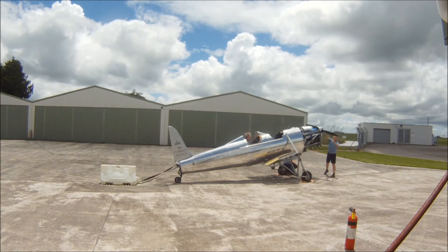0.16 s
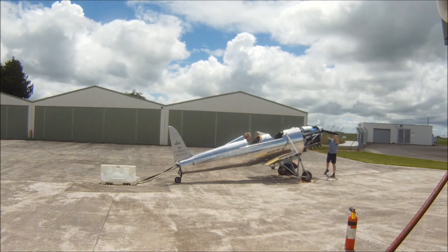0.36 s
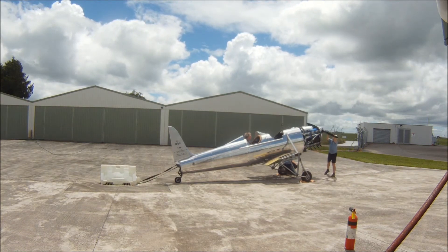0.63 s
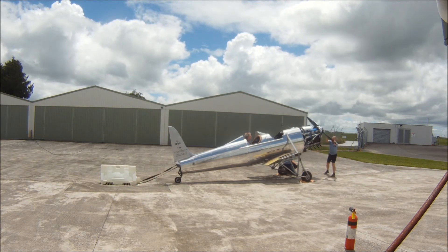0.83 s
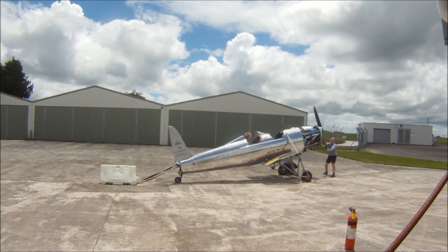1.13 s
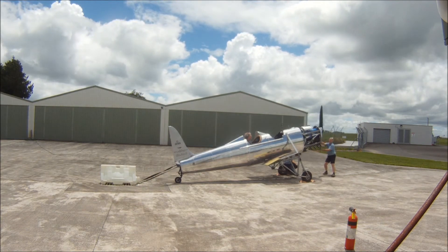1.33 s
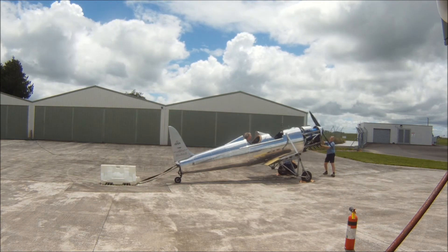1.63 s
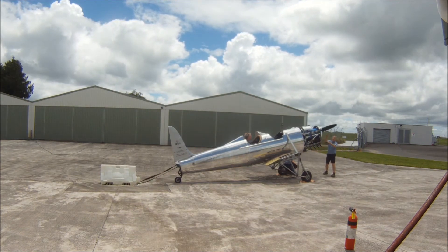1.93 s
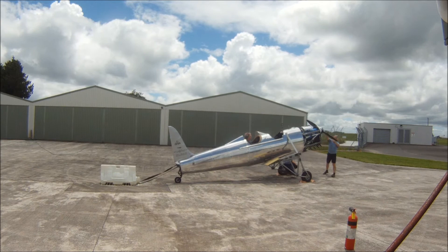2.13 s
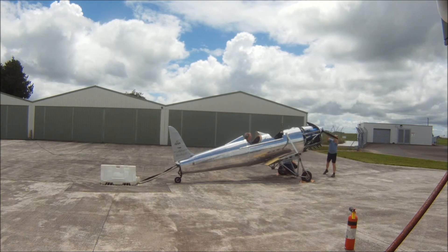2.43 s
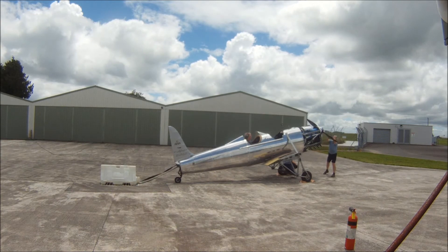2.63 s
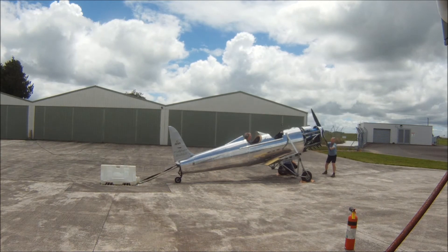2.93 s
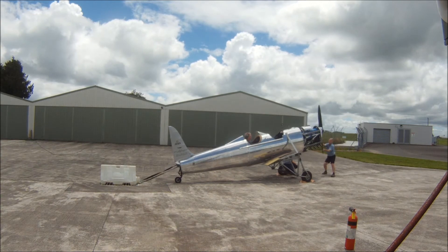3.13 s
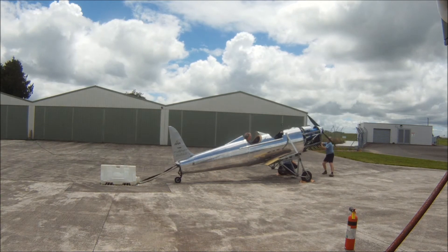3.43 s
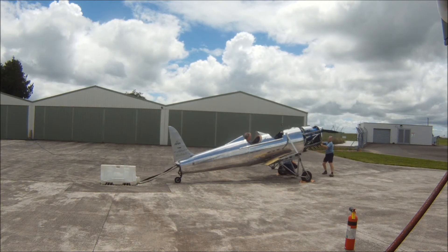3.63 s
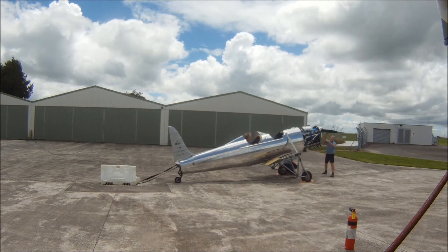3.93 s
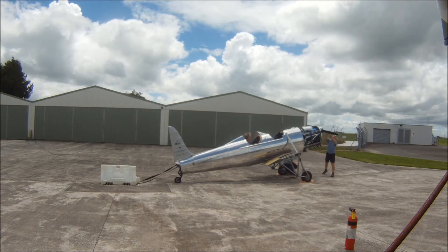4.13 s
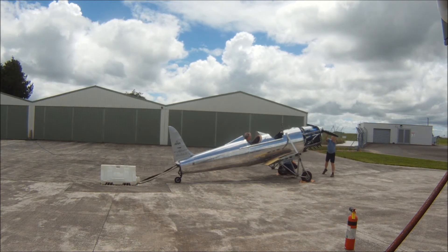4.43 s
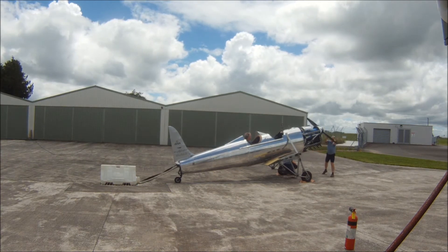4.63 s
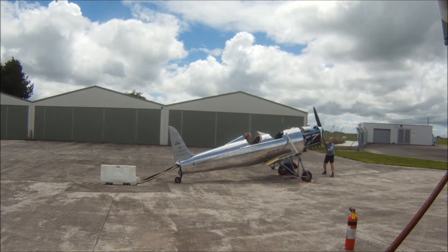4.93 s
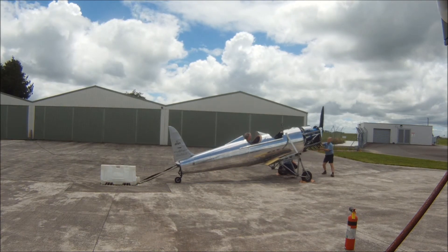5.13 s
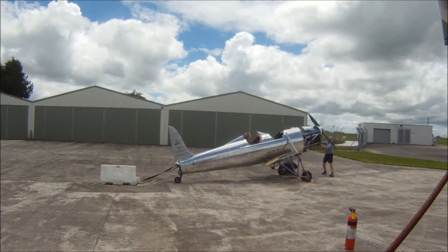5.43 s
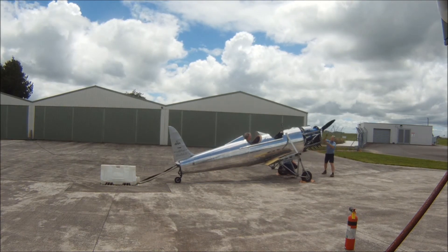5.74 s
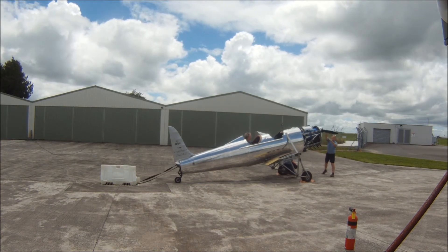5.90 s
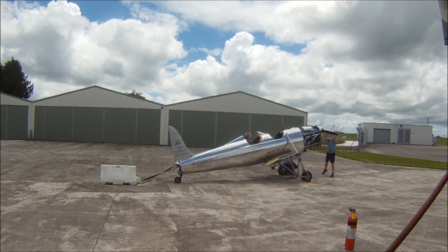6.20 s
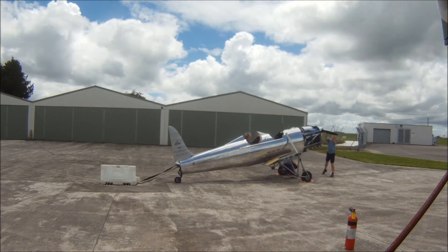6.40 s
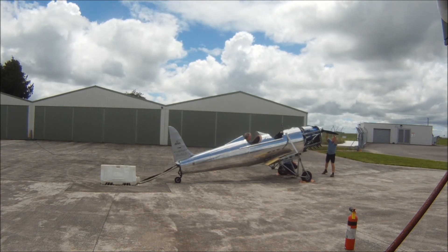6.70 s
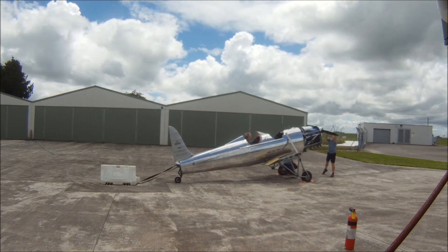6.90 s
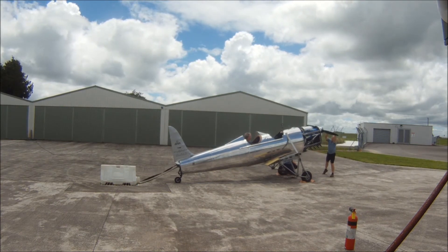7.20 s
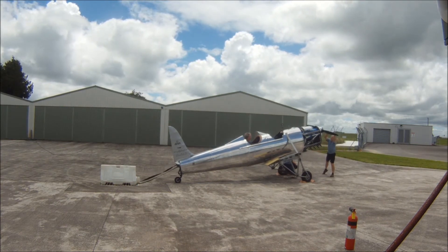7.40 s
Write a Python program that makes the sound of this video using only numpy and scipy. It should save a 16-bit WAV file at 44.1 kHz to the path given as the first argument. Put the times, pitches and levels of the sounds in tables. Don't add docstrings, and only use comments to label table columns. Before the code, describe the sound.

Outdoors on a concrete apron, faint ticks of loose metal come first over a low generator hum and a receding propeller plane. Then three loud, double-hit clanks sound about two seconds apart, each rattling on and scattering back off the hangars. Small birds chirp faintly. Later, gusts thump the exposed microphone. The engine never catches. The sound is gritty and low-fidelity, with a harsh mirrored treble.

```python
import sys
import numpy as np
from scipy import signal
from scipy.fft import rfft, irfft, next_fast_len
from scipy.io import wavfile
from scipy.ndimage import uniform_filter1d

SR = 44100
rng = np.random.default_rng(int(sys.argv[2]) if len(sys.argv) > 2 else 0)


def gain_from_db(level_db):
    decades = np.asarray(level_db, float) / 20
    return 10 ** decades


def unload_audio(sound):
    columns = np.transpose(np.atleast_2d(sound))
    steps = np.round(np.clip(columns, -1, 1) * 32767)
    wavfile.write(sys.argv[1], SR, steps.astype(np.int16))


N = 333389

# pitch_hz, level_db, t60_s
COWLING = [(360.6, -15.5, 0.91), (455, -10.5, 0.38), (593.6, 9, 0.21), (633, -16, 0.38)]


def engine():
    out = np.zeros(N)
    ms = np.arange(1500) / SR * 1000
    hardest_db = max(row[1] for row in CLANKS)
    for s, db, hz, low_db, middle_db, top_db, chatter_ms in blows():
        softer_db = hardest_db - db
        u = ms / chatter_ms
        chatter = rng.standard_normal(len(u)) * u * np.exp(-u)
        crankcase = crowd(hz - 130, 429 - 9 * softer_db, 0.012)
        low = crowd(545, 106, 0.068)
        middle = crowd(1330, 270, 0.034)
        top = crowd(5000, 700, 0.029)
        parts = [(crankcase, 0),
                 (low, low_db - 7.5),
                 (middle, middle_db - 0.5 - 0.24 * softer_db),
                 (top, top_db + 11 - 0.4 * softer_db)]
        for modes, rel_db in parts:
            add(out, s - 0.003, gain_from_db(db + rel_db) * ring(modes, chatter))
        cowling_db = db + low_db - 4.5 - 0.59 * softer_db
        add(out, s + 0.00412, gain_from_db(cowling_db) * ring(COWLING, np.ones(1)))
    return out


# start_s, peak_db, crankcase_hz, echo_db (added to the first echo's level)
CLANKS = [
    (1.504, -17, 3236, -3),
    (3.3478, -15.5, 3006, -6),
    (5.2799, -16, 3184, -2),
]
# delay_s, level_db (re clank), pitch_ratio, low_db and middle_db (re
CLANK_PARTS = [
    (0, -2, 1.0, 0.5, -13),
    (.031, -7.5, 0.94, -8, -13),
    (.0785, -2, .97, -4.5, -17),
    (.1065, -12.5, 0.9, -5.5, -25),
]
# start_s,
# peak_db, crankcase_hz, body_db (re peak)
KNOCKS = [(0.0648, -42.5, 2750, 11), (0.2209, -49, 2360, 22.5), (0.2713, -46.5, 2900, 10),
          (0.3107, -49, 2340, -13), (0.6389, -52.5, 2460, 17), (1.6244, -38, 2980, 8.5),
          (1.6596, -41.5, 3070, 14.5), (1.7255, -51, 3020, 24), (1.8562, -44.5, 2370, 17),
          (1.8771, -40, 2780, 16), (1.9929, -40, 3050, 9.5), (2.0807, -41, 2780, 9),
          (2.1545, -43, 2820, -24), (2.2433, -48, 3080, 12), (3.5279, -44, 3040, -3),
          (3.5872, -38.5, 2870, 5), (3.6845, -44.5, 2470, 14.5), (3.7394, -47.5, 2630, 20),
          (3.8222, -43.5, 3040, 11.5), (3.931, -38, 2880, 7), (4.1465, -37.5, 3140, 4),
          (4.1694, -42, 2080, 8.5), (4.8055, -50, 2350, 14), (5.2684, -37.5, 2860, 14.5),
          (5.4394, -45.5, 3100, 18.5), (5.4904, -49, 2690, -4), (5.6161, -36.5, 3400, 3.5),
          (5.7743, -48.5, 2640, 21), (5.8666, -44, 2920, 12.5), (6.0696, -45.5, 2970, 10)]


def blows():
    rows = []
    for s, db, hz, echo_db in CLANKS:
        for k, (delay, rel_db, ratio, low_db, middle_db) in enumerate(CLANK_PARTS):
            part_db = db + rel_db + echo_db * (k == 2)
            chatter_ms = 1.53 if k else 3.1
            rows.append((s + delay, part_db, hz * ratio, low_db, middle_db, -22, chatter_ms))
    for s, db, hz, body_db in KNOCKS:
        rows.append((s, db, hz, body_db, body_db - 10, -18, 3.2))
    return rows


def crowd(hz, spread_hz, t60, count=30):
    place = np.linspace(-2.05, 2.13, count) + rng.uniform(-0.13, 0.12, count)
    return np.c_[hz + spread_hz * place, -4.3 * place ** 2, t60 * rng.uniform(0.6, 1.4, count)]


def ring(modes, chatter):
    hz, db, t60 = np.transpose(modes)[:, :, None]
    t = np.arange(round(t60.max() * SR)) / SR
    decaying = gain_from_db(db - 60 * t / t60) * np.sin(2 * np.pi * hz * t)
    response = decaying.sum(0) * (1 - np.exp(-(t / 0.0012) ** 2))
    out = signal.fftconvolve(response, chatter)
    return out / abs(out).max()


# pitch_hz, t60_s
NEAR_DECAY = [(300, 0.17), (1200, 0.1), (3000, 0.13), (5500, 0.29)]
FAR_DECAY = [(250, 2.9), (500, 3.5), (1000, 1.7), (2800, 1.64), (5500, 2.4)]
# pitch_hz, level_db
RETURN_COLOUR = [(250, 0), (450, 11.5), (850, -5), (1300, 5), (2400, 0.5), (3700, -1), (5000, -1.5)]


def apron(x):
    frame = dict(nperseg=256, noverlap=192)
    hz, t, z = signal.stft(x, SR, **frame)
    power = uniform_filter1d(abs(z) ** 2, size=3, axis=0)
    back = 0
    for decays, db in ((NEAR_DECAY, -4.5), (FAR_DECAY, -10.5)):
        keep = 1e-6 ** ((t[1] - t[0]) / read(decays, hz))
        echoes = [signal.lfilter([0, 0, 1 - k], [1, -k], p) for k, p in zip(keep, power)]
        back = back + gain_from_db(db) ** 2 * np.array(echoes)
    ragged = rng.standard_normal(N) * gain_from_db(1.84 * wander(54.0))
    noise = signal.stft(ragged, SR, **frame)[2]
    noise = gain_from_db(read(RETURN_COLOUR, hz))[:, None] * noise / np.sqrt(np.mean(abs(noise) ** 2))
    return x + signal.istft(noise * np.sqrt(abs(back)), SR, **frame)[1][:N]


# start_s, length_s, rumble_db, buffet_db (re rumble)
GUSTS = [(0, 0.052, -44, -5), (0.197, 0.096, -38, -7), (1.19, 0.033, -37.5, -27),
         (1.313, 0.082, -39.5, -21), (3.22, 0.39, -36, -17), (3.71, 0.15, -32.5, -10.5),
         (4.23, 0.047, -45, -3), (4.452, 0.075, -29.5, -18), (4.668, 0.12, -29.5, -12),
         (4.83, 0.3, -28.5, -15), (5.424, 0.13, -34, -11), (5.548, 0.17, -30, -18), (5.79, .4, -33.5, -17),
         (6.314, 0.3, -29, -12), (6.69, 0.037, -29.5, -9), (6.793, 0.44, -28.5, -13.5),
         (7.25, 0.38, -36, -25)]
# pitch_hz, level_db (per Hz)
RUMBLE = [(12, -26), (28, 6), (45, 4), (80, 1.5), (130, -9), (300, -87)]
BUFFET = [(60, -12.5), (120, 2), (250, -6.5), (450, -15), (1200, -47), (2500, -99)]


def wind():
    rise_s, fall_s = 0.02, 0.03
    rumble = bursts([row[:3] for row in GUSTS], -52, rise_s, fall_s)
    buffet_rows = [(s, length, db + rel_db) for s, length, db, rel_db in GUSTS]
    buffet = bursts(buffet_rows, -50, rise_s, fall_s)
    wakes = [(s, 0.022, db - 13 + 0.5429 * (edge_db + 32.5)) for s, db, hz, edge_db in EDDIES]
    buffet = np.hypot(buffet, bursts(wakes, calm_db=-90, rise_s=0.0074, fall_s=0.012))
    out = rumble * gain_from_db(0.68 * wander(38.5)) * coloured(RUMBLE)
    out += buffet * gain_from_db(0.53 * wander(33.0)) * coloured([*BUFFET, (5000, -110)])
    return out + eddies()


# start_s, peak_db, pitch_hz, edge_db (re peak)
EDDIES = [(4.453, -21.5, 89, -29.5), (4.488, -21.5, 62.7, -34), (4.695, -18, 62, -43),
          (4.852, -15, 130, -49), (4.862, -9, 72, -46.5), (4.918, -18, 59, -31), (5.025, -12.5, 149, -21.5),
          (5.04, -13, 194, -33), (5.062, -33, 153, -44), (5.469, -20.5, 50.3, -31), (5.494, -27, 51.1, -39),
          (5.564, -17, 78, -49), (5.579, -22, 74, -34.5), (5.62, -30.5, 71, -18.5), (5.839, -30, 87.6, -31),
          (6.103, -19.5, 64.6, -31), (6.336, -18, 130, -40), (6.349, -16, 50.3, -71),
          (6.538, -17, 51.1, -35), (6.62, -22.5, 86.1, -29), (6.635, -10.5, 75, -41), (6.805, -33, 68, -32),
          (6.836, -16, 51.3, -33), (7.04, -13.5, 49, -36), (7.06, -18, 70.4, -37),
          (7.117, -15.5, 52.6, -36), (7.224, -18.5, 93.4, -55), (7.367, -22, 51.1, -31.5)]


def eddies():
    out = np.zeros(N)
    edge_filter = signal.butter(5, [400, 1750], "bandpass", fs=SR)
    for s, db, hz, edge_db in EDDIES:
        t = np.arange(round(2.2 * SR / hz)) / SR
        turns = hz * (t - t[-1] / 2) + rng.uniform(-0.31, 0.19)
        wave = np.hanning(len(t)) * -np.cos(2 * np.pi * turns)
        edge = signal.lfilter(*edge_filter, rng.standard_normal(600)) * np.hanning(600)
        add(out, s - 0.006, gain_from_db(db - 2.5) * wave)
        add(out, s + 0.00098, gain_from_db(db + edge_db) * edge / abs(edge).max())
    return out


# start_s, length_s, start_hz, end_hz, level_db
WHISTLES = [(.025, 0.05, 4150, 3350, -64), (1.13, 0.07, 2000, 2010, -63), (1.135, 0.11, 2090, 2230, -60.5),
            (1.15, .07, 3380, 3480, -65), (1.158, 0.075, 4350, 4320, -64), (2.61, .075, 3950, 3680, -66),
            (2.885, .055, 4300, 4170, -68), (3.205, .11, 4350, 4100, -65),
            (4.927, 0.047, 2110, 2090, -49.5), (4.99, .035, 2110, 2130, -61), (5.385, .06, 4850, 4400, -60),
            (5.66, 0.18, 4300, 4100, -69.5), (6.79, 0.055, 4250, 3950, -67), (7.26, .12, 4230, 4050, -69),
            (7.295, .03, 5800, 5650, -70), (7.505, .045, 5400, 4900, -67)]
# start_s, length_s, start_hz, end_hz, level_db
TRILLS = [
    (1.2, 0.069, 5400, 5450, -62),
    (1.201, .065, 4950, 5000, -65),
    (1.25, 0.24, 2290, 2130, -62.5),
    (2.985, 0.165, 5700, 3600, -58.5),
    (3.236, .092, 6100, 4400, -57),
    (5.55, .08, 4200, 4150, -69),
    (6.82, 0.18, 2930, 2970, -64),
    (6.93, .12, 4700, 4250, -67),
    (7.12, 0.14, 4750, 4250, -66.5),
    (7.38, 0.18, 3200, 3030, -62.5),
]


def birds():
    out = np.zeros(N)
    notes = [(*row, 0) for row in WHISTLES] + [(*row, 47.6) for row in TRILLS]
    for s, length, start_hz, end_hz, db, trill in notes:
        t = np.arange(round(length * SR)) / SR
        hz = end_hz + (start_hz - end_hz) * (1 - t / length) ** 1.25
        shape = signal.windows.tukey(len(t), 0.4) * (1 - 0.84 * np.sin(np.pi * trill * t) ** 2)
        swell = gain_from_db(db + 0.005 * (end_hz - hz))
        blur = evened(uniform_filter1d(rng.standard_normal(len(t)), size=250))
        turns = np.cumsum(hz * (1 + 0.007 * blur)) / SR
        add(out, s, np.sqrt(2) * swell * shape * np.sin(2 * np.pi * turns))
    return out * gain_from_db(2.7 * wander(68.0))


# start_s, length_s, level_db
FLOCK = [
    (.95, 0.21, -71),
    (1.2, .12, -86),
    (1.32, 0.33, -68),
    (4.22, 0.37, -69.5),
    (6.92, 0.21, -76),
]


def flock():
    gain = bursts(FLOCK, calm_db=-76.5, rise_s=0.094, fall_s=0.094)
    twitter = coloured([(4100, -61), (4450, -1.0), (4950, -4.0), (5300, -32)])
    return gain * gain_from_db(1.9 * wander(31.0)) * twitter


# time_s, shaft_hz, level_db
FLYBY = [
    (0, 27.02, -44),
    (2, 25.62, -45.5),
    (4, 24.2, -44.5),
    (7.6, 23.59, -52),
]
# order, level_db
FLYBY_ORDERS = [(2, 0), (3, 1.5), (4, -3)]


def aircraft():
    hz, db = along(FLYBY)
    return gain_from_db(db) * drone(hz, FLYBY_ORDERS, 0.002, 2.2)


# order, level_db
GENERATOR_ORDERS = [(2, -43), (3, -43.5), (4, -56), (5, -59), (6, -59), (8, -62)]


def generator():
    return drone(43.05, GENERATOR_ORDERS, 0.0015, 1.5)


def drone(hz, orders, waver, flutter_db):
    turns = np.cumsum(hz * (1 + waver * wander(1.0))) / SR
    out = np.zeros(N)
    for k, db in orders:
        sine = np.sqrt(2) * np.sin(2 * np.pi * (k * turns + rng.random()))
        out += gain_from_db(db + flutter_db * wander(12.6)) * sine
    return out


# pitch_hz, level_db (per Hz)
AIR = [(15, -55), (30, -28.5), (65, -2.5), (114, -5.5), (171, -14), (291, -17), (578, -18), (744, -28),
       (1550, -40.5), (2240, -35.5), (3010, -35.5), (4870, -50.5), (5990, -89), (7790, -90)]


def air():
    patches = rng.standard_normal((513, N // 256 + 5))
    patches = uniform_filter1d(patches, 10, 0)
    patches = evened(uniform_filter1d(patches, 16, 1))
    z = signal.stft(coloured(AIR), nperseg=1024, noverlap=768)[2]
    z = z * gain_from_db(0.63 * patches[:, :z.shape[1]])
    return gain_from_db(-43.5) * signal.istft(z, nperseg=1024, noverlap=768)[1][:N]


def evened(x):
    return x / np.sqrt(np.mean(x ** 2) + 1e-20)


def read(points, hz):
    f, value = np.transpose(points)
    return np.interp(np.log(hz + 1), np.log(f + 1), value)


def along(rows):
    s, *columns = np.transpose(rows)
    return [np.interp(np.arange(N) / SR, s, c) for c in columns]


def add(mix, s, sound):
    part = mix[round(s * SR):][:len(sound)]
    part += sound[:len(part)]


def coloured(points):
    size = next_fast_len(N)
    gain = gain_from_db(read(points, np.fft.rfftfreq(size, 1 / SR)))
    return evened(irfft(rfft(rng.standard_normal(size)) * gain, size)[:N])


def wander(hz):
    return coloured([(0, 0), (hz, 0), (2 * hz, -40)])


def bursts(rows, calm_db, rise_s, fall_s):
    t = np.arange(N) / SR
    power = gain_from_db(calm_db) ** 2
    for s, length, db in rows:
        before = np.maximum((s - t) / rise_s, 0)
        after = np.maximum((t - s - length) / fall_s, 0)
        power = power + gain_from_db(db) ** 2 * np.exp(-2 * before ** 2 - 2 * after ** 2)
    return np.sqrt(power)


def scene():
    mix = apron(engine()) + wind() + birds() + flock() + aircraft() + generator() + air()
    return mix[None]


def band_limit(x):
    return signal.sosfilt(signal.butter(12, 16490, fs=SR, output="sos"), x)


def record(dry):
    longer = np.pad(dry, ((0, 0), (0, 588)), "reflect")
    smooth = signal.oaconvolve(longer, signal.firwin(63, 5960, fs=SR)[None], "same")
    sampled = signal.resample_poly(smooth, 40, 147, axis=1, window=("kaiser", 8))
    held = np.repeat(sampled, 4, axis=1)
    back = signal.resample_poly(held, 147, 160, axis=1)[:, 1:]
    treble_edge = signal.firwin(255, 15400, window=("kaiser", 9), fs=SR)
    finished = signal.oaconvolve(back, treble_edge[None], "same")[:, :N]
    return band_limit(finished)


dry = scene()
out = record(dry)
unload_audio(out)
```